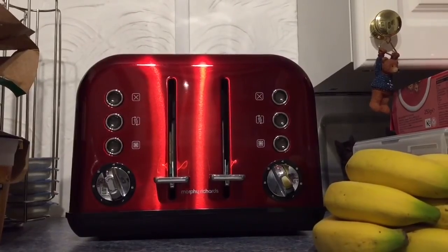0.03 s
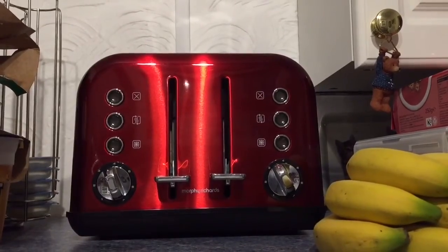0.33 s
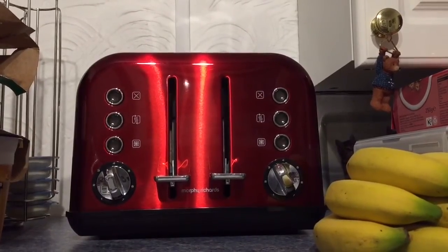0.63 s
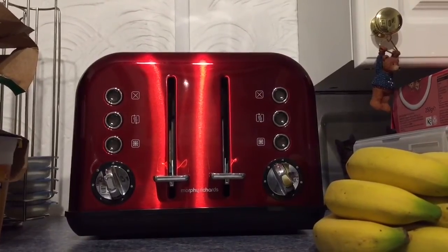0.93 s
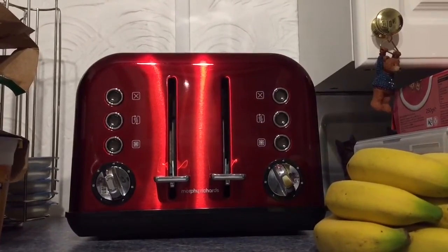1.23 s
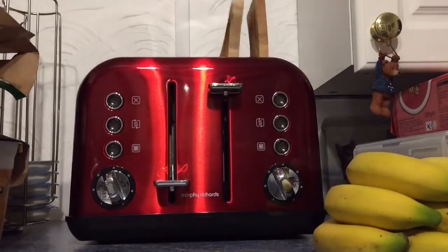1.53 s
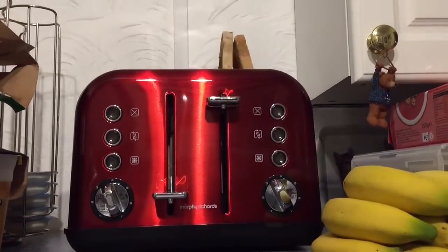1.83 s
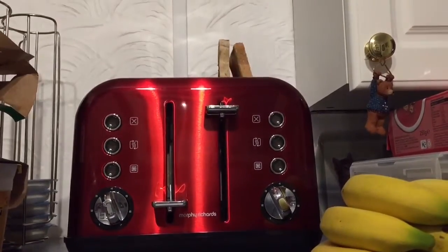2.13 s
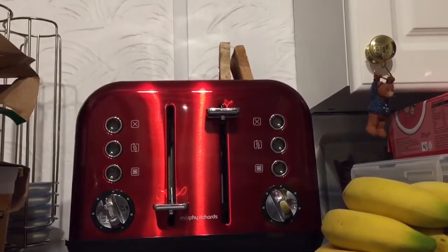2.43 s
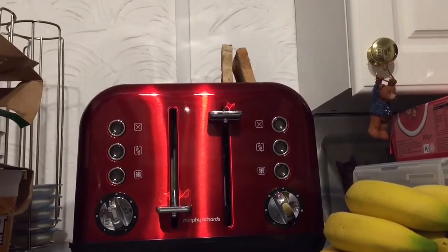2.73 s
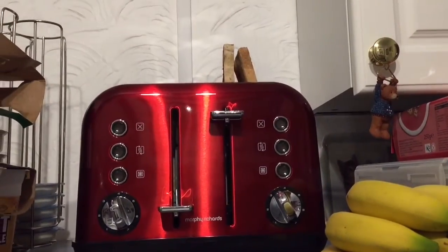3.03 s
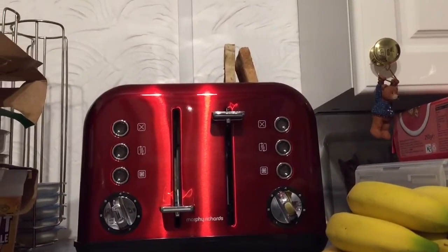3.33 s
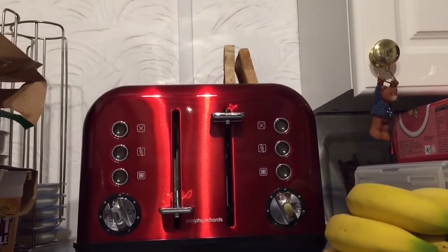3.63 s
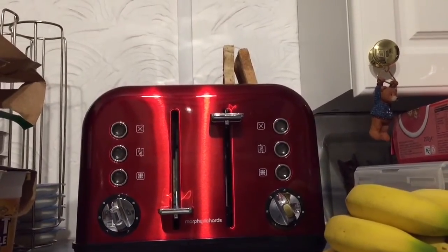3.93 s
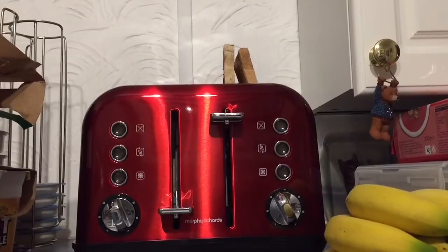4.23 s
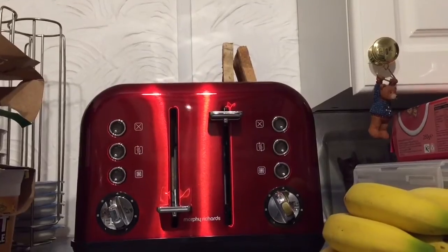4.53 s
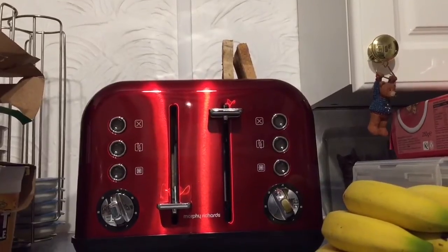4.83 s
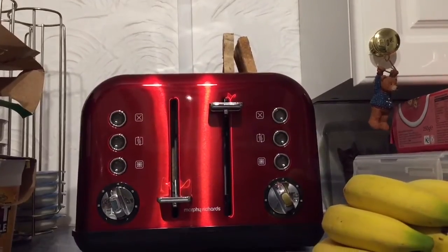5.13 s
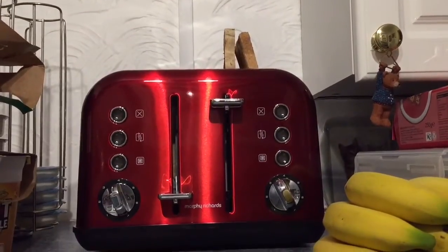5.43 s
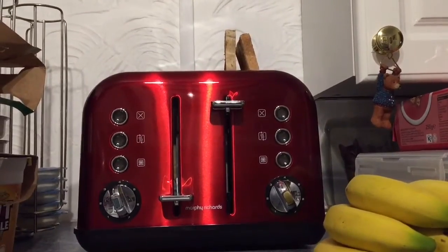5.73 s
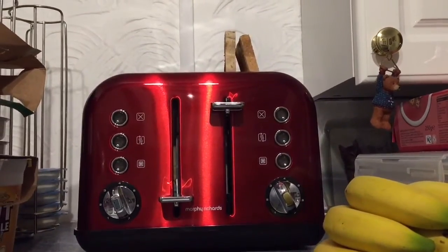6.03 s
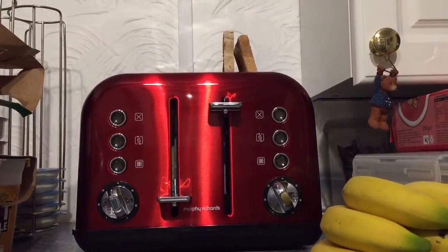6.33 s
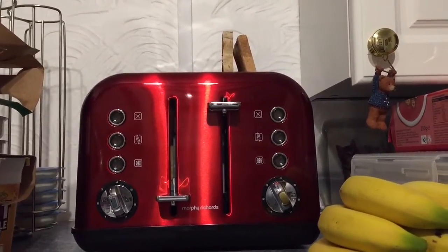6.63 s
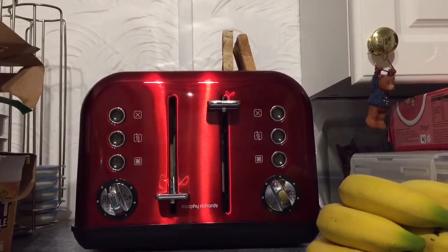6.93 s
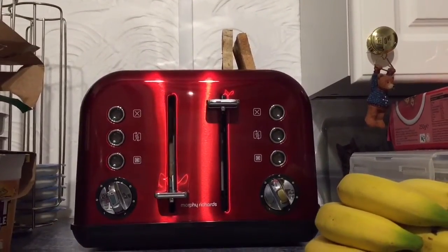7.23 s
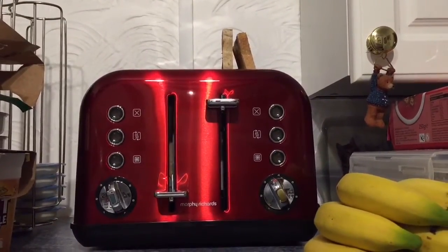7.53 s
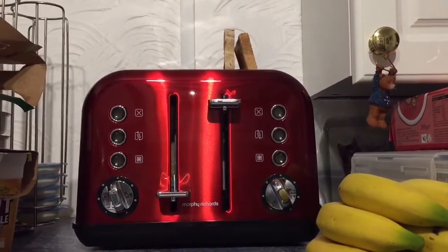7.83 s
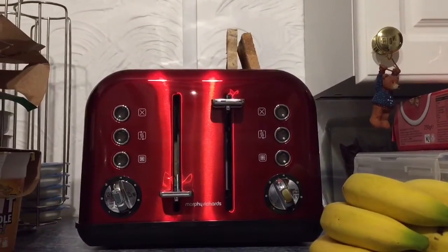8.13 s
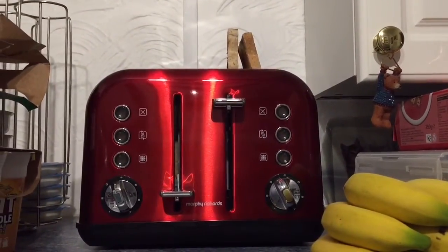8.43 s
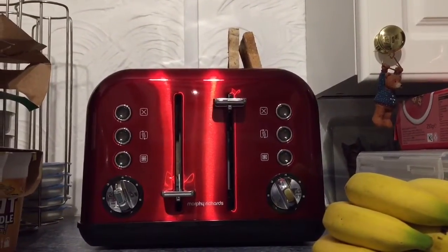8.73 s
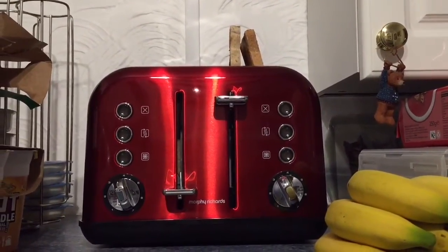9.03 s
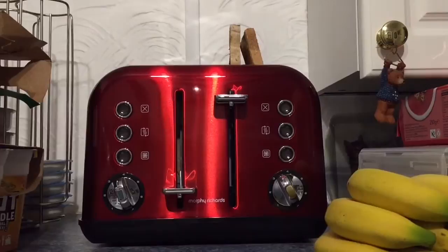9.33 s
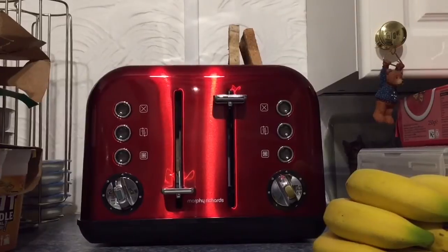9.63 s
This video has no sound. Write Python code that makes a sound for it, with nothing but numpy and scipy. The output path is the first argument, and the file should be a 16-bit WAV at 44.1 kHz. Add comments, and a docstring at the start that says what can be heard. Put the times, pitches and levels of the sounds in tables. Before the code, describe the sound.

In a quiet kitchen, a steel toaster suddenly pops up with a loud, sharp clack and a hollow boom from its case. The toast jumps, drops back and rattles against the wire guards, its crust scratching the metal, and settles within a second. After that there is only faint room noise, with a few soft bumps, ticks and a small knock close to the hand-held microphone.

```python
"""A steel toaster pops up in a quiet kitchen: the carriage shoots up and clacks against its stop, and two
slices of toast jump, fall back and bounce, while the sprung carriage chatters to rest against the wire guards.
Every contact rings the steel, scratches crust and thumps the counter; the hollow case booms. Then only room
noise, with a few soft bumps, ticks and a knock around the hand-held microphone."""
import sys
import numpy as np
from scipy import signal
from scipy.fft import rfft, irfft, next_fast_len
from scipy.io import wavfile
from scipy.ndimage import map_coordinates

SR = 44100
rng = np.random.default_rng(int(sys.argv[2]) if len(sys.argv) > 2 else 0)


def output_pcm(signal):
    """Save a mono or channel-first signal as 16-bit PCM at the path in sys.argv[1].

    Samples are clipped to [-1, 1] before scaling.
    """
    pcm = np.clip(np.atleast_2d(signal).T, -1, 1) * 32767
    wavfile.write(sys.argv[1], SR, np.round(pcm).astype(np.int16))


N = 431738
T = np.arange(SR) / SR  # seconds since a blow
STOP_S, STOP_DB = 1.3834, -13.5  # the carriage meets its stop
# the toast drops back on the carriage: t/s, level/dB
LANDINGS = [(1.4890, -25), (1.548, -42), (1.667, -35.5), (1.686, -41.5), (1.708, -41.5), (1.819, -46.5),
            (1.973, -50.5), (2.065, -59), (2.098, -58.5), (2.137, -69)]


def amp(db):
    """Decibels to gain."""
    return 10 ** (np.asarray(db) / 20)


def unit(x):
    """Scale to rms 1."""
    return x / np.sqrt(np.mean(x ** 2) + 1e-20)


def along(points, hz):
    """Read a curve of (f/Hz, value) points on a log frequency axis."""
    f, values = np.transpose(points)
    return np.interp(np.log(hz + 1), np.log(f + 1), values)


def noise(spectrum, size=SR, ripple=0):
    """Coloured noise of rms 1, with an optional fine ripple in dB."""
    m = next_fast_len(size)
    colour = amp(along(spectrum, np.fft.rfftfreq(m, 1 / SR)) + ripple)
    return unit(irfft(rfft(rng.standard_normal(m)) * colour, m)[:size])


def fade(t, t60):
    """Exponential decay, 60 dB down after t60."""
    return np.exp(-np.log(1000) * t / t60)


def swell(rise_s):
    """The attack of a contact."""
    return 1 - np.exp(-2 * T / max(rise_s, 1e-4))


def add(track, s, sound):
    """Mix a sound into the track at s seconds."""
    part = track[round(s * SR):][:len(sound)]
    part += sound[:len(part)]


def ring(modes, scatter_db, waver):
    """Damped modes at new strengths for each blow; loose parts make their phases waver."""
    out = np.zeros(len(T))
    for hz, db, t60 in modes:
        drift = np.interp(T, np.linspace(0, 1, 60), np.cumsum(rng.standard_normal(60)))
        phase = 2 * np.pi * (hz * T + rng.random()) + waver * drift
        out += amp(db + scatter_db * rng.standard_normal()) * fade(T, t60) * np.sin(phase)
    return out / np.sqrt(sum(amp(db) ** 2 for hz, db, t60 in modes) / 2)


def room(level_db):
    """Room tone: the steady low rumble and hiss of the kitchen."""
    # rumble and hiss: f/Hz, level/dB
    spectrum = [(20, -10), (45, -2.5), (80, -1.5), (160, -1), (270, -0.5), (320, -7.5), (450, -8),
                (550, -10.5), (1000, -12.5), (2000, -14.5), (4000, -17.5), (6000, -19), (12000, -24.5),
                (15700, -27)]
    return amp(level_db) * noise(spectrum, size=N)


def taps():
    """Small dead contacts around the microphone: noise bursts without a ring."""
    # soft bumps, faint dry ticks, a hollow knock with lead-in and bounce: t/s, level/dB, t60/s
    bumps = [(3.077, -58, 0.064), (3.091, -52, 0.07), (4.908, -59, 0.1), (4.965, -68, 0.089),
             (5.976, -61, .08), (8.11, -66, .25)]
    ticks = [(3.344, -67, 0.096), (5.108, -64, 0.075), (5.128, -66.5, 0.11)]
    knocks = [(9.763, -55.5, 0.049), (9.7742, -44, 0.052), (9.784, -45.5, 0.045)]
    # their tone colours: f/Hz, level/dB
    dull = [(25, -12), (60, 4.5), (120, 10.5), (280, -2), (500, -8), (1200, -27.5), (5000, -62)]
    papery = [(150, -22), (500, 1), (1400, -5), (2500, -11), (5000, -26), (14000, -34)]
    hollow = [(150, -26), (500, -11), (800, -10.5), (1150, 3.5), (1400, -6), (1700, -13), (2200, -10.5),
              (3200, -23), (6000, -28), (14000, -44)]
    out = np.zeros(N)
    for hits, colour, rise_s in [(bumps, dull, .002), (ticks, papery, .0021), (knocks, hollow, .0014)]:
        for s, db, t60 in hits:
            add(out, s, amp(db) * noise(colour) * swell(rise_s) * fade(T, t60))
    return out


def case_booms(hz, t60, rise_s):
    """The air and walls of the hollow case take a few cycles to swing up, then die quickly."""
    # the carriage kicks its spring: t/s, level/dB
    kicks = [(1.389, -27), (1.687, -38), (1.763, -34), (1.834, -44.5), (1.952, -55)]
    out = np.zeros(N)
    envelope = swell(rise_s) ** 2 * fade(T, t60)
    for s, db in kicks:
        add(out, s, amp(db) * envelope / envelope.max() * np.sin(2 * np.pi * hz * T))
    return out


def landing_clunks(clunk_db, hum_db):
    """Each landing gives a short dead clunk and sets the base plate humming."""
    # the clunk: f/Hz, level/dB
    spectrum = [(100, -15), (400, -5), (750, -6), (1100, -1.5), (1900, -2), (3000, -11), (6000, -13.5),
                (9000, -20), (16000, -28)]
    # modes of the base plate: f/Hz, level/dB, t60/s
    base_modes = [(230.8, -1, 0.4), (388, -7, .22), (483.8, -5.5, 0.35)]
    out = np.zeros(N)
    for s, db in LANDINGS:
        clunk = amp(clunk_db) * noise(spectrum) * swell(rise_s=.005) * fade(T, t60=.062)
        hum = amp(hum_db) * ring(base_modes, scatter_db=.3, waver=.14) * swell(rise_s=.056)
        add(out, s, amp(db) * (clunk + hum))
    return out


def rattles(count, gap_s, jitter_s, lead_s, brush_db):
    """A light brush, then the sprung carriage chatters at a steady beat, ever weaker: t/s, level/dB."""
    # first hit of each rattle: t/s, level/dB, loss per rebound/dB
    first_hits = [(1.442, -43, 6), (1.606, -55, 3), (1.711, -46.5, 2), (1.769, -42, 5.5),
                  (1.867, -55.5, 10), (1.954, -48.5, 5), (2.093, -55, 17), (2.184, -66.5, 20)]
    hits = [(s - lead_s, db + brush_db) for s, db, _ in first_hits]
    for s, db, loss_db in first_hits:
        for k in range(count):
            jitter = min(k, 1) * jitter_s * rng.standard_normal()
            hits.append((s + k * gap_s + jitter, db - k * loss_db))
    return hits


def contacts():
    """Every contact in the toaster: its time, its attack and how hard it drives each part."""
    # the latch slips and the carriage knocks up its rail: t/s, level/dB
    slips = [(1.3675, -38), (1.3713, -29.5), (1.376, -30.5)]
    # crust grazes the slot: t/s, level/dB
    grazes = [(1.398, -35), (1.440, -39.5), (1.487, -33.5), (1.567, -45.5), (1.603, -43.5), (1.738, -40),
              (1.864, -51), (1.934, -47)]
    # each kind's touch: rise/s (negative: instant), shell/dB, carriage/dB, guards/dB, crust/dB, thump/dB
    slip_touch = (-0.06, -.5, -4.5, -30, -12, -23)
    stop_touch = (-0.02, -22, -11, -22, -14, -29)
    landing_touch = (.010, 0, -17, -26, -17, -6)
    graze_touch = (.007, -5, -22, -17, -.5, -10.5)
    rattle_touch = (.013, -1.5, -10, 3.5, -11.5, -9.5)
    chatter = rattles(count=4, gap_s=.028, jitter_s=.0015, lead_s=.011, brush_db=-7.5)
    kinds = [(slips, slip_touch), ([(STOP_S, STOP_DB)], stop_touch), (LANDINGS, landing_touch),
             (grazes, graze_touch), (chatter, rattle_touch)]
    return [(s, rise_s, db + np.array(shares_db))
            for hits, (rise_s, *shares_db) in kinds for s, db in hits]


def crowded_modes(depth_db, spacing_hz):
    """Thin steel has countless close resonances: a fine ripple that colours every blow alike."""
    hz = np.fft.rfftfreq(next_fast_len(SR), 1 / SR)
    return depth_db * map_coordinates(rng.standard_normal(SR), [hz / spacing_hz])


def panel_clatter(ripple):
    """A wash of panel and room modes, each band dying at its own speed."""
    # struck panels: f/Hz, level/dB
    spectrum = [(100, -20), (200, 2), (320, -7.5), (500, -3), (720, -1), (1000, -1), (1800, -3), (2500, -7),
                (3800, -10.5), (5000, -15), (8000, -19), (16000, -32)]
    # how long panels and kitchen hold a blow: f/Hz, t60/s
    hold = [(150, .4), (500, .33), (1200, .27), (3000, .33), (8000, .33), (16000, .3)]
    hz, t, bands = signal.stft(noise(spectrum, ripple=ripple), SR, nperseg=256)
    decay = fade(t, along(hold, hz)[:, None])
    return signal.istft(bands * decay, SR, nperseg=256)[1][:len(T)]


def blows(ripple, shell_ring_db, buzz_db, grain_db):
    """Each blow shakes shell, carriage and guards, scratches crust on steel and thumps the counter."""
    # steel shell, sprung carriage, wire guards with their case: f/Hz, level/dB, t60/s
    shell_modes = [(150, -5.5, .22), (234.5, -5.5, 0.5), (265, -8.5, 0.46), (370, -7, 0.15), (421, -7, .25),
                   (483, -1.5, 0.26), (542.2, -6, 0.36), (896.6, -3.5, .3), (1020, -3.5, 0.18),
                   (1180, -4, 0.18), (1277, -6.5, 0.28), (1320, -6, 0.48), (1379, -6.5, .26),
                   (1617, -3.5, 0.12), (1847, -7, .26), (2006, -5.5, 0.24), (2094, -9, 0.25)]
    carriage_modes = [(935, 0, .18), (1481, -10, 0.16), (1538, -6, 0.2), (1740, -10.5, 0.085),
                      (2358, -12.5, 0.3), (2640, -6, .12), (2620, -7, .12), (4348, -7, .16),
                      (4530, -6.5, 0.13), (4646, -7, 0.097), (5200, -16, .22), (5570, -13, .2),
                      (6800, -17.5, .2), (14330, -16, .15)]
    guard_modes = [(200, -9, .25), (226, -6, .3), (284, -8.5, 0.37), (626, -12, 0.3), (935, -4, .2),
                   (1250, -5, 0.14), (1430, -10, .16), (2530, -5.5, 0.21), (2639, -3, 0.2),
                   (2733, -2, 0.12), (2740, -5, .16), (2910, -1, 0.15), (2952, -2, .16), (3061, -1, 0.13),
                   (3069, -3.5, 0.11), (3270, -9, 0.18), (3460, -12, 0.16), (4600, -13, .18),
                   (5300, -15, 0.18), (5480, -12.5, .18), (5920, -13.5, .18), (6200, -14, .18),
                   (12553, -16, .18), (13050, -15, .19), (15400, -17.5, .18)]
    # loose wires chatter in their holes, crust scrapes, the toaster rocks on its feet: f/Hz, level/dB
    buzz_colour = [(600, -22.5), (1000, -12.5), (2000, -13.5), (2550, -0.5), (3100, -4), (3700, -12),
                   (4800, -18), (5700, -11), (7000, -26), (16000, -31)]
    crust_colour = [(800, -19.5), (2500, -3.5), (4200, 2.5), (5800, 4), (7500, -1), (9700, -.5),
                    (11500, -3), (12800, -1), (13800, -3), (15300, 1.5)]
    thump_colour = [(25, -26), (45, -13), (70, -1), (95, -3.5), (135, 1.5), (200, -11), (500, -39.5),
                    (2000, -80)]
    out = np.zeros(N)
    for s, rise_s, parts_db in contacts():
        shell = panel_clatter(ripple) + amp(shell_ring_db) * ring(shell_modes, scatter_db=.6, waver=.35)
        carriage = ring(carriage_modes, scatter_db=2.1, waver=.1)
        buzz = amp(buzz_db) * noise(buzz_colour, ripple=ripple) * fade(T, t60=.2)
        guards = ring(guard_modes, scatter_db=3.5, waver=1.3) + buzz
        grains = np.interp(T, np.linspace(0, 1, 700), rng.standard_normal(700))
        crust = unit(noise(crust_colour, ripple=ripple) * amp(grain_db * grains)) * fade(T, t60=.36)
        thump = noise(thump_colour) * swell(rise_s=.012) * fade(T, t60=.22)
        blow = amp(parts_db) @ np.array([shell, carriage, guards, crust, thump])
        add(out, s, swell(rise_s) * blow)
    return out


def stop_clack(crack_db, tail_db, frame_db):
    """Steel on steel at the top stop: a hard crack, a short tail and a bright ring in the frame."""
    # the crack: f/Hz, level/dB
    spectrum = [(300, -20), (900, -7.5), (2000, -5.5), (3500, -5.5), (4450, 4.5), (5100, -4.5),
                (7000, -3.5), (9000, -6), (13000, -5.5), (16000, -7)]
    # short modes of the frame: f/Hz, level/dB, t60/s
    frame_modes = [(990.5, -4, .08), (1401.4, -3, 0.1), (1620, -2.5, .08), (2643, -4.5, 0.038),
                   (2630, -2.5, 0.067), (3120, -3.5, .07), (4330, 2.5, 0.032), (4470, 4.5, .035),
                   (4720, 3, .035), (6018, -2, .04), (5800, -4, .04), (7170, -4, 0.044), (7040, -6, 0.044),
                   (8840, -9.5, 0.047), (9180, -9, .035), (11650, -5, 0.039), (14300, -5, .05)]
    crack = amp(crack_db) * noise(spectrum) * fade(T, t60=.0075)
    tail = amp(tail_db) * noise(spectrum) * fade(T, t60=.04)
    frame = amp(frame_db) * ring(frame_modes, scatter_db=.5, waver=.2)
    out = np.zeros(N)
    add(out, STOP_S, amp(STOP_DB) * swell(rise_s=.002) * (crack + tail + frame))
    return out


def scene():
    """The toaster and the small taps over room tone, in mono."""
    ripple = crowded_modes(depth_db=3, spacing_hz=59)
    toaster = blows(ripple, shell_ring_db=-4.5, buzz_db=-1.5, grain_db=3.5)
    toaster += stop_clack(crack_db=14, tail_db=-10, frame_db=-2)
    toaster += case_booms(hz=186.4, t60=.1, rise_s=.05)
    small_taps = taps()
    toaster += landing_clunks(clunk_db=3, hum_db=-4)
    return (toaster + small_taps + room(level_db=-69))[None]


def record(dry):
    """A small microphone's band limits and port dips; a soft limiter rounds the clack's loudest peak."""
    # dips of the port: f/Hz, width/Hz, level/dB
    dips = [(4891, 230, -3.5), (7700, 450, -2.5), (10400, 300, -3.5)]
    low_cut_hz, top_hz, limiter_ceiling = 44, 15800, .66
    m = next_fast_len(N + SR // 2)
    hz = np.fft.rfftfreq(m, 1 / SR)
    thin = signal.sosfilt(signal.butter(4, low_cut_hz, "high", fs=SR, output="sos"), dry)
    limited = thin / (1 + (thin / limiter_ceiling) ** 6) ** (1 / 6)
    port = amp(sum(db / (1 + ((hz - centre) / width) ** 2) for centre, width, db in dips))
    high_cut = 1 / (1 + (hz / top_hz) ** 240)
    return irfft(rfft(limited, m) * port * high_cut, m)[..., :N]


dry = scene()
out = record(dry)
output_pcm(out)
```